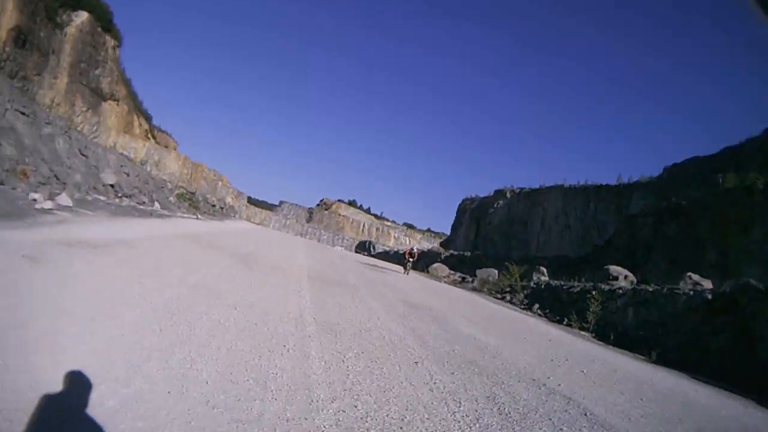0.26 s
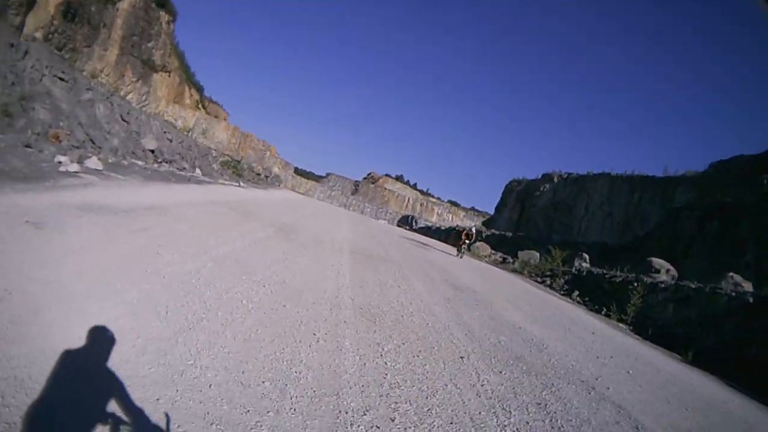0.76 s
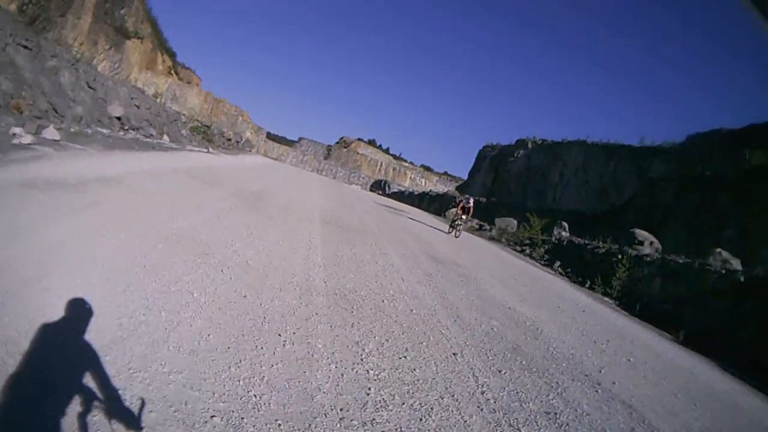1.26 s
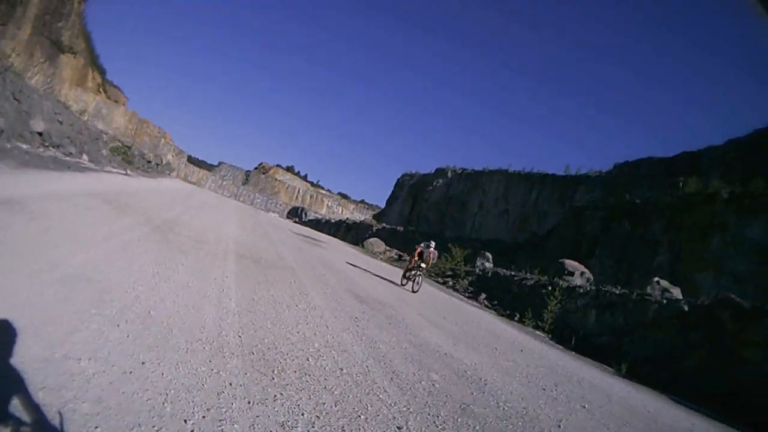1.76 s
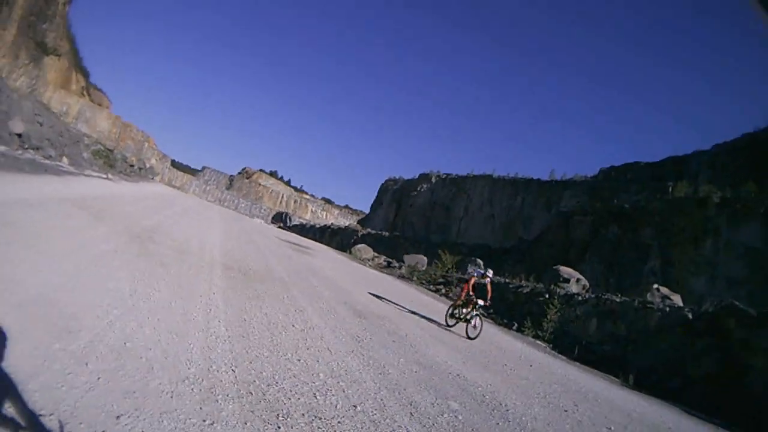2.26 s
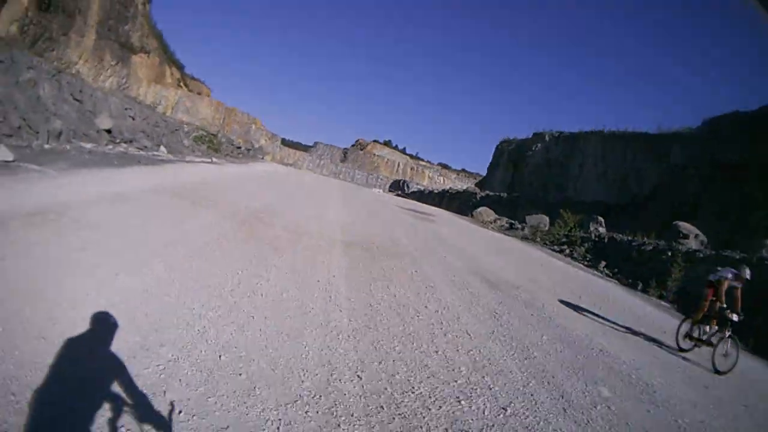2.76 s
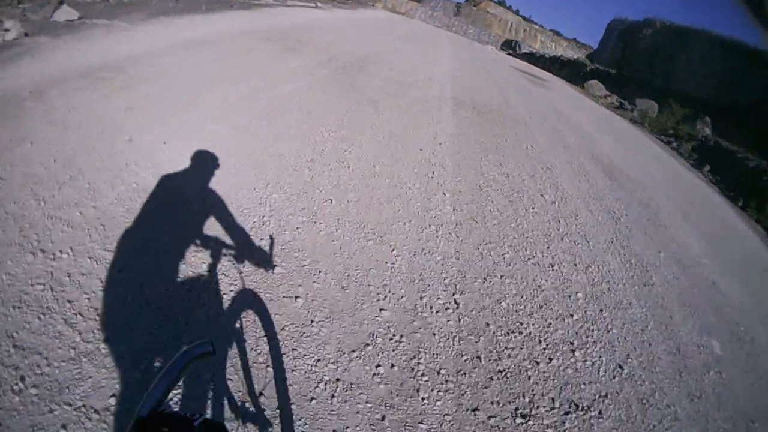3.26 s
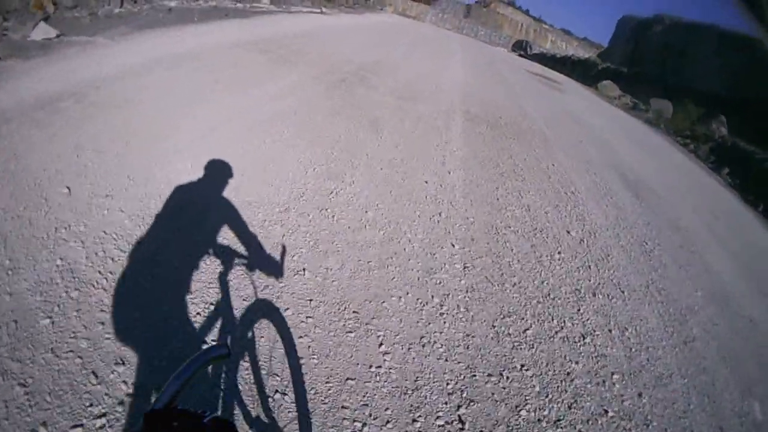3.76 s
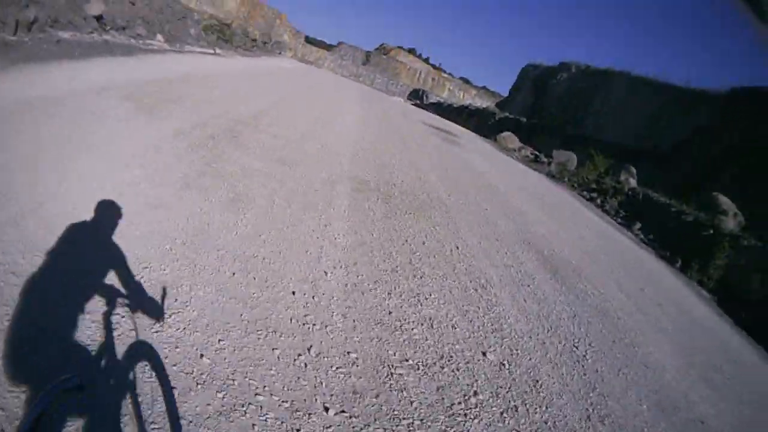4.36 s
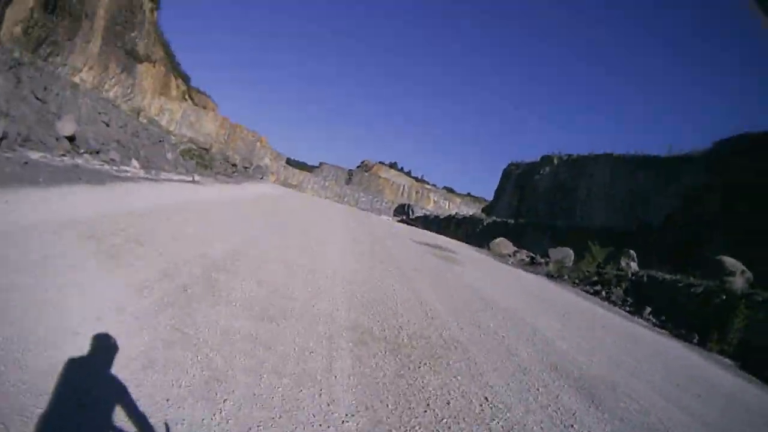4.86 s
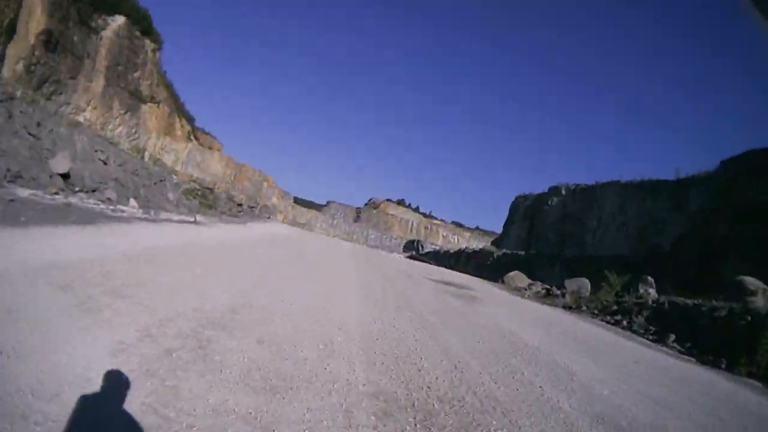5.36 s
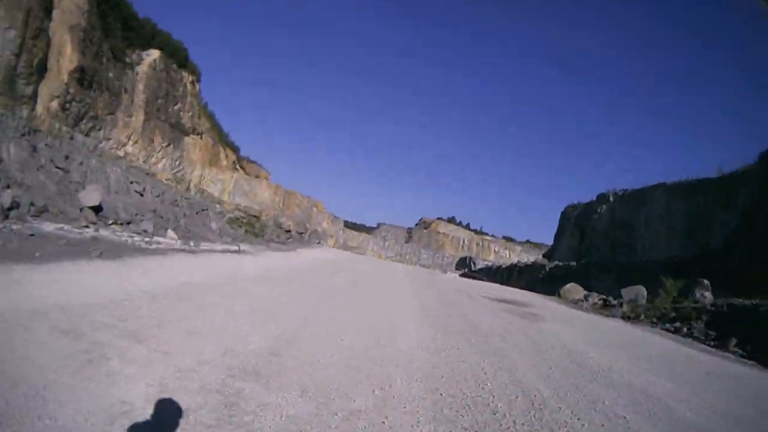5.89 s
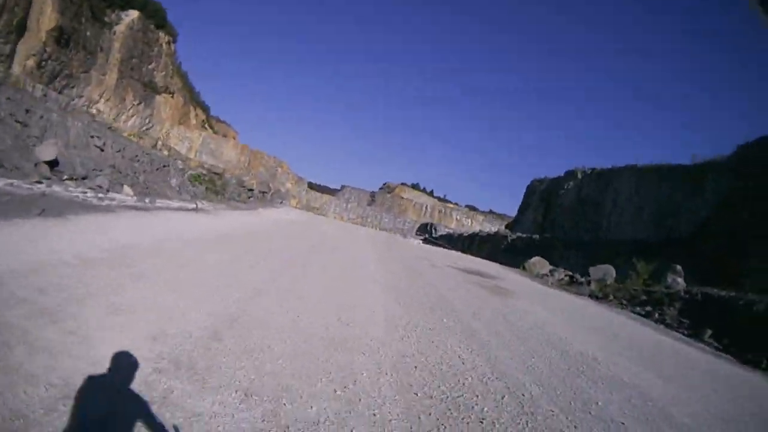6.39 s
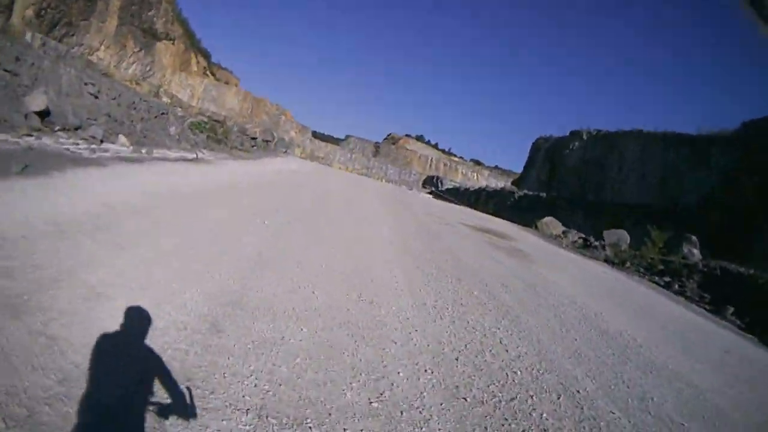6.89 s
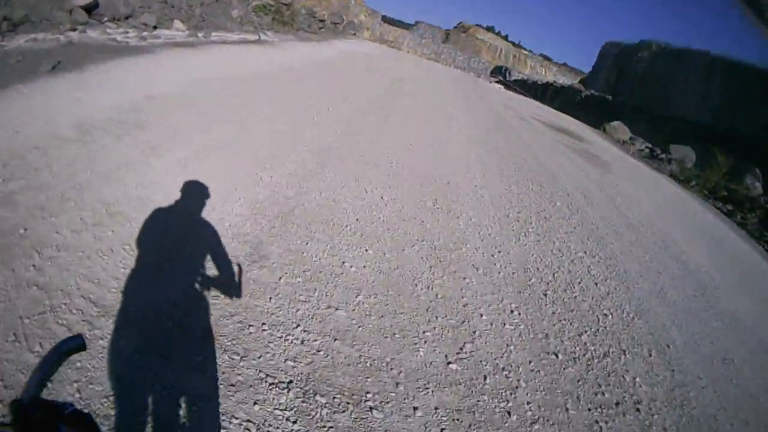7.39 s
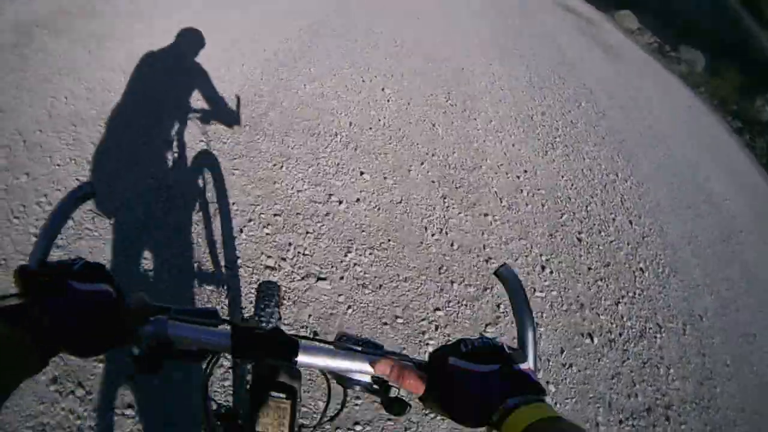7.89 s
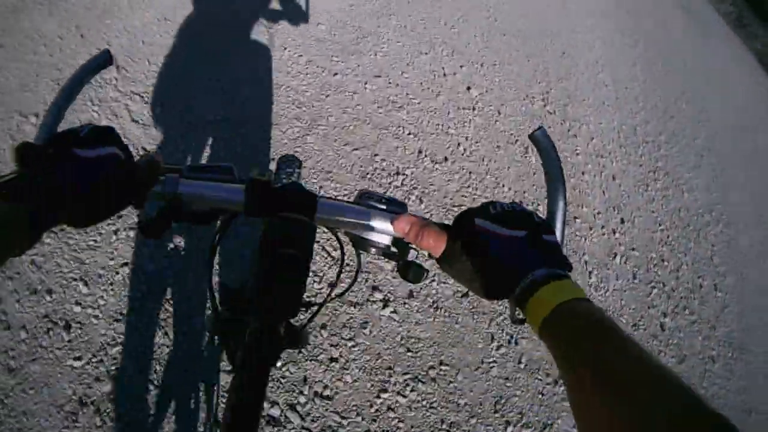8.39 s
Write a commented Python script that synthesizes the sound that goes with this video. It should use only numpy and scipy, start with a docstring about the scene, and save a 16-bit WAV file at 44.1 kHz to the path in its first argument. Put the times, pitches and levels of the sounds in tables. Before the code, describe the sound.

From the rider's own helmet camera, sealed in a small case, a bicycle grinds uphill over gravel. A low, hollow crunch swells and sags about every two thirds of a second with the pedalling. Deep wind buffets thump the microphone throughout. Irregular dull knocks, loose-part clicks and a faint steady rattle ride on top, with a few brief bright pings, mostly after the middle. Outdoors, mono, close, muffled, with slight hiss.

```python
"""Crunching gravel swells with each pedal stroke as a bicycle climbs, amid wind thumps, knocks and pings.
It is heard through the closed case of a small helmet camera, with one microphone.
Shaped noise makes the wind; random grains ring the case, frame and loose parts for tyres and rattle.
Knocks, clicks and pings are dying rings started by short runs of contacts, at listed times.
The recorder hisses more as the signal swings wider."""
import sys
import numpy as np
from scipy import signal
from scipy.fft import rfft, irfft
from scipy.io import wavfile
from scipy.ndimage import uniform_filter1d

SR = 44100
rng = np.random.default_rng(int(sys.argv[2]) if len(sys.argv) > 2 else 0)


def store_pcm(level_fs):
    """Save levels as 16-bit WAV."""
    pcm = np.round(np.clip(level_fs, -1, 1) * 32767).astype(np.int16)
    wavfile.write(sys.argv[1], SR, np.atleast_2d(pcm).T)


N = 381024

# Strength of the wind buffeting. Each row: time in seconds, level in dB before chance gusts and limiting.
WIND = [(0.0, -21.5), (0.14, -31), (0.19, -19.5), (0.43, -22), (0.5, -27.5), (0.77, -22), (0.84, -29.5),
        (1.44, -23.5), (1.61, -29), (1.66, -22.5), (2.07, -30), (2.19, -20), (2.38, -28.5), (2.48, -18.5),
        (2.53, -40), (2.6, -23), (2.81, -15.5), (2.86, -21), (2.93, -18), (3.01, -30.5), (3.2, -21),
        (3.3, -21.5), (3.41, -33), (3.46, -29.5), (3.78, -26.5), (3.97, -15.5), (4.06, -29.5), (4.16, -15),
        (4.28, -33), (4.45, -18.5), (4.48, -29), (4.71, -33.5), (4.79, -12), (4.86, -23.5), (5.27, -23),
        (5.63, -29.5), (5.68, -22), (5.99, -34.5), (6.06, -19.5), (6.13, -32.5), (6.21, -18.5), (6.33, -33),
        (6.42, -21.5), (6.47, -38), (6.52, -21), (6.69, -33), (6.74, -21), (6.81, -32), (7.1, -18.5),
        (7.2, -30.5), (7.24, -22), (7.51, -21.5), (7.53, -14.5), (7.87, -30.5), (7.94, -20), (8.13, -28),
        (8.18, -14), (8.37, -32.5), (8.45, -17.5), (8.64, -26)]
# Tone of the slow wind lumps. Each row: frequency in Hz, relative level in dB.
BUFFET = [(1.8, -43), (3.0, -5.5), (16, 6.5), (28, 1.5), (47, -8.5), (70, -20.5), (150, -120)]
# Tone of the quick wind eddies. Each row: frequency in Hz, relative level in dB.
FLUTTER = [(30, -35), (55, -23.5), (80, -5.5), (130, -13), (250, -20), (400, -44.5), (1500, -80)]
# Upper rumble of the wind. Each row: time in seconds, level in dB.
THROB = [(0.0, -34), (0.21, -39), (0.24, -39), (0.38, -49.5), (1.18, -38.5), (1.28, -32.5), (1.44, -43),
         (1.61, -38), (1.63, -39), (1.76, -39), (1.85, -59), (2.02, -61), (2.09, -32), (2.14, -45),
         (2.5, -37), (3.27, -46), (3.34, -34.5), (3.44, -49), (3.51, -28), (3.75, -44.5), (3.9, -33),
         (3.95, -44), (4.09, -37.5), (4.33, -51), (4.38, -32), (4.64, -52), (4.76, -41), (5.13, -50),
         (5.22, -30), (5.63, -54), (5.7, -38), (5.9, -50), (6.16, -36.5), (6.23, -51), (6.45, -46),
         (6.5, -34.5), (6.69, -53), (6.81, -33), (6.88, -54), (7.03, -34), (7.05, -52), (7.29, -38.5),
         (7.39, -51), (7.51, -42), (7.58, -52), (7.65, -34), (8.13, -37), (8.45, -28.5), (8.49, -39),
         (8.64, -39)]
# Tone of that rumble. Each row: frequency in Hz, relative level in dB.
THROB_BAND = [(22, -29.5), (36, -2.5), (48, -6), (66, -14.5), (95, -27), (150, -47.5), (400, -89.5)]
# Base levels of the ride. Each row: time in seconds, grit in dB, rattle in dB, wind eddies in dB.
# Pedal load is added to all three, and GRIT_DB to the grit.
RIDE = [(0.0, -61.5, -62, -52.5), (0.72, -65.5, -60.5, -49.5), (1.51, -61.5, -58.5, -51.5),
        (1.88, -61, -64, -59), (2.07, -64, -63, -51), (2.19, -68.5, -62, -56), (2.74, -59, -58.5, -45),
        (3.15, -59.5, -62, -57.5), (3.44, -62, -58.5, -51), (3.78, -65.5, -64.5, -52.5),
        (4.11, -59.5, -60.5, -50), (4.57, -59.5, -64.5, -52.5), (5.1, -62, -59.5, -46.5),
        (5.41, -61, -64, -57.5), (5.77, -63.5, -60, -52), (6.06, -61.5, -63.5, -54.5),
        (6.3, -64.5, -60.5, -45), (6.66, -60.5, -63.5, -55.5), (6.98, -62, -61, -47.5),
        (7.07, -60.5, -65.5, -49.5), (7.34, -57.5, -61.5, -52.5), (7.55, -59.5, -57, -46),
        (7.7, -59, -68, -45.5), (8.13, -61.5, -59.5, -50.5), (8.33, -59, -61.5, -52), (8.64, -57, -61, -48)]
# Pedal strokes. Each row: start in seconds, length in seconds, time from start to peak in seconds,
# peak load in dB, coasting level afterwards in dB, upper crunch over lower crunch in dB.
STROKES = [(-0.15, 0.47, 0.15, -47.5, -61, -15), (0.491, 0.54, 0.15, -44.5, -57, 0),
           (1.18, 0.5, 0.34, -46.5, -64, -2), (1.978, 0.37, 0.37, -41, -53.5, -2),
           (2.665, 0.32, 0.16, -45, -55.5, -2), (3.359, 0.73, 0.16, -46.5, -48.5, 6.5),
           (4.172, 0.4, 0.27, -47, -53, -7), (4.891, 0.44, 0.2, -43.5, -59, -11),
           (5.506, 0.4, 0.13, -44.5, -67, -11.5), (6.099, 0.49, 0.24, -43, -58.5, -9.5),
           (6.731, 0.41, 0.26, -45.5, -56, -15.5), (7.41, 0.4, 0.085, -42.5, -53, 2),
           (8.104, 0.41, 0.056, -45, -64.5, 0)]
# Modes (ringing tones) of the hollow case. Each row: pitch in Hz, nominal width in Hz, relative level in dB.
CASE = [(323.2, 93, 2), (401, 67, 2), (442, 150, -13), (538, 71, -18.5), (920, 160, -28.5),
        (1330, 400, -22)]
# Tyre hum. Each row: time in seconds, central pitch in Hz.
HUM = [(0.0, 417), (0.24, 413), (0.74, 427), (0.89, 418), (0.91, 455), (0.98, 418), (1.42, 432),
       (2.26, 420), (2.28, 427), (2.62, 405), (2.72, 429), (3.83, 441), (4.04, 412), (4.09, 420),
       (6.76, 394), (6.95, 430), (7.34, 417), (7.65, 434), (7.99, 412), (8.33, 456), (8.37, 421),
       (8.64, 414)]
# Tone of the dull gravel hiss. Each row: frequency in Hz, relative level in dB.
GRIT = [(150, -6.5), (280, 4.5), (650, -10), (1000, -4.5), (1350, -9.5), (1700, -16), (2200, -13),
        (4000, -20.5), (8000, -20.5)]
# Coarse gravel scrub. Each row: time in seconds, level in dB before SCRUB_TRIM_DB.
COARSE = [(0.0, -56), (0.29, -58), (0.96, -54), (1.47, -60), (1.9, -68), (2.12, -61), (2.26, -65),
          (2.53, -60), (2.79, -61.5), (3.18, -61.5), (3.85, -58), (4.16, -51.5), (5.05, -59), (5.46, -67.5),
          (5.8, -56.5), (5.97, -64), (6.21, -59.5), (7.05, -60), (7.17, -66), (7.65, -61), (7.92, -60),
          (8.64, -63.5)]
# Frame under coarse stones. Each row: pitch in Hz, nominal width in Hz, relative level in dB.
COARSE_RING = [(720, 99, -3), (876, 37, -6), (1110, 410, 2), (1316, 180, -1.5)]
# Loose parts. Each row: pitch in Hz, nominal width in Hz, relative level in dB.
RATTLE = [(1528, 44, -17), (1872, 130, -12.5), (2140, 420, -16), (2480, 110, -15), (2600, 180, -7),
          (3110, 148, -6), (3926, 240, -11.5), (4760, 440, -22), (5180, 280, -6)]
# Highest loose part during the steady rattle. Each row: time in seconds, pitch in Hz.
TOP_RATTLE = [(0.0, 5260), (1.37, 5100), (3.18, 5270), (3.25, 4850), (3.44, 5470), (3.99, 5010),
              (4.14, 5030), (6.38, 5180), (6.52, 5030), (6.62, 5090), (7.31, 5160), (7.43, 5220),
              (8.25, 5090), (8.64, 5240)]
# Stones and jolts reaching the case. Each row: time in seconds, body peak in dB before softening,
# upper modes in dB and low push in dB (both relative to the body), tilt of the upper modes in dB per octave.
KNOCKS = [(0.0914, -28, -14, -16, 13), (0.2393, -20, -27, -8.5, -12), (0.4113, -44, -8, 9, -6),
          (0.441, -47, -20, 6, -6), (0.521, -26, -21, -14, -8), (0.5743, -37, -21, -20, 0),
          (0.8784, -34.5, -16, -1, -3), (1.231, -25.5, -7, -8.5, 4), (1.449, -36, -30, -11, 1),
          (1.67, -36, -6, -5, -6), (1.7498, -26, -17, -9, 0), (1.83, -39.5, -16, 7, -8),
          (1.882, -44, 6, -8, -4), (2.0935, -35, -4, -13, 6), (2.173, -38, 0, -15, 12),
          (2.207, -28, -16, -28, -4), (2.366, -40, -10, -7, -8), (2.467, -39.5, 4, -5, 1.5),
          (2.517, -27, -14, -6, 3), (2.609, -25.5, -10, -7, 7), (2.86, -31.5, -9, -5, -2),
          (3.271, -41, 9, -18, 2), (4.101, -37, -21, -12, -3), (4.393, -28, -9, 4.5, 0),
          (4.596, -22, -12.5, -22, 14), (4.692, -48, -17, 12, 0), (4.81, -43, -15, 15, 0),
          (4.8389, -27, -28, -13, 3), (5.235, -27, -15, 2.5, -5), (5.379, -31, -14, -2, -3),
          (5.4484, -37, 3.5, 9.5, -6), (5.7161, -22, -27, -4.5, 1), (6.104, -40, -20, -6, -6),
          (6.1495, -36.5, -6, -9, 7), (6.462, -39.5, 5.5, -9, 0), (6.4886, -24.5, -19, 0, 5),
          (6.7907, -25.5, -15, -11, 9), (6.848, -41, -24, -20, -6), (7.0695, -24, -22, -19, 4),
          (7.221, -36, -4, -24, -9), (7.5021, -30.5, -29, 2, 2), (7.539, -35, 2.5, -10, -2),
          (7.656, -39, 3.5, 6, -2), (7.787, -26, -14, -26, 10), (7.837, -34, 4, 6, -2),
          (8.1618, -49, -23, 26, 0), (8.45, -30, -5, -5, 9)]
# Rattle clicks. Each row: time in seconds, peak in dB, favoured pitch in Hz, brightness in dB.
CLICKS = [(0.2399, -33, 2100, -18), (0.525, -34.5, 2690, -17), (0.454, -44, 1540, -21),
          (0.614, -40.5, 3100, -8), (0.617, -46, 1530, -27), (0.622, -51, 2600, -12),
          (0.6716, -39, 2600, -5), (0.680, -37, 2820, -4), (0.691, -48, 3100, 2), (0.8772, -38, 3000, -6.5),
          (0.886, -49, 3100, 9), (0.898, -50, 3120, 10), (0.912, -47, 2900, -14), (1.2296, -44, 2300, -17),
          (1.65, -38, 2900, -27), (1.685, -48, 3100, -20), (1.699, -47, 3100, -20), (1.713, -41, 3050, -25),
          (1.749, -41, 1850, -7), (1.941, -46, 2800, -17), (2.049, -51, 2600, -14),
          (2.407, -49.5, 3000, -19), (2.435, -39, 2640, -15), (2.44, -37, 2550, -19),
          (2.459, -50, 2700, -11), (2.517, -42, 2700, -24), (2.733, -41, 3120, -13),
          (2.859, -37.5, 3140, 3), (3.2346, -34.5, 2480, -42), (3.2404, -38, 2480, -36),
          (3.245, -36, 2480, -35), (3.3327, -47, 3110, -26), (3.479, -41, 2470, -41),
          (3.6695, -46, 3150, -25), (4.597, -49, 1500, -36), (5.0, -46.5, 3130, -8),
          (5.016, -53, 3130, -20), (5.059, -40, 3130, -17), (5.19, -42, 3130, -1), (5.203, -48, 3130, -10),
          (5.234, -41.5, 2300, -17), (5.7133, -36.5, 2030, -36), (5.97, -43.5, 2660, -8),
          (6.126, -39, 2800, -10), (6.335, -47, 2470, -37), (6.487, -37, 2200, -24),
          (6.734, -49, 1960, -27), (6.791, -42, 2690, -25), (7.135, -41.5, 3130, -18),
          (7.35, -46, 3130, -13), (7.547, -39, 2450, -10), (7.756, -39, 2500, -22.5),
          (7.7664, -31, 2140, -10), (7.7665, -37, 1530, -23), (7.787, -49, 2630, 7),
          (8.273, -46, 2450, -12), (8.398, -50, 2440, -1), (8.545, -39.5, 3000, 0)]
# Small metal part. Each row: pitch in Hz, relative level in dB, time to die by 60 dB in seconds.
PING = [(2690, -17, 0.028), (3140, -4, 0.013), (4240, -6.5, 0.025), (4930, 0.5, 0.021),
        (5240, 11.5, 0.0057), (6500, 5, 0.0052), (7400, -18, 0.0081)]
# Pings. Each row: time in seconds, peak in dB, tilt in dB per octave, boost of the three lowest modes in dB.
PINGS = [(2.636, -44, -6, -25), (4.197, -36, 24, -11), (5.0833, -41, -16, -8), (6.288, -27, 9, 7),
         (6.512, -28, 23, 5), (7.159, -38.5, -15, 4), (7.177, -40, -12, -1)]

GUSTY_DB, GUST_S = 3, 0.035  # chance lulls and lumps within the wind
CAPSULE_LIMIT = 0.42  # the capsule yields less and less towards this swing
RISE_S, RISE_DB = 0.051, -1.5  # the push starts quickly, to this far under its peak
SAG_DB, FALL_S = -5, 0.12  # the sag from peak to end, then the release
USUAL_LOAD_DB = -48
GRIT_LOAD, RATTLE_LOAD, EDDY_LOAD = 0.18, 0.047, 0.07  # dB for each dB of load above usual
HUM_WIDTH_HZ, HUM_DB, HUM_WANDER = 48.6, 1, 0.017  # hum gain beside the lowest case mode; pitch drift (share)
SURGE_DB, SURGE_S = 1.8, 0.03  # loose and firm patches of gravel
GRIT_DB, CRACKLE_DB, CRACKLE_S = 6.5, 2.5, 0.0034  # hiss raised by this; its fine grain
SCRUB_TRIM_DB = -3
RATTLE_WANDER, RATTLE_FITS_DB, RATTLE_FIT_S = 0.0059, 1, 0.097  # pitch drift (share); each part's own fits
DETUNE, UNEVEN_DB = 0.012, 2.5  # no two hits ring alike: spread of pitch (share) and of mode levels
KNOCK_WIDTH_HZ = 110  # a blow damps the frame: least nominal width of a mode
KNOCK_CHATTER_S = 0.0005
CRACK_DB, CRACK_HZ, CRACK_S = -9, 1880, 0.0069  # splintering noise: level before tilt, top of band, decay
CLICK_WIDTH_HZ = 100  # a struck part touches its neighbours: least nominal width of a mode
CLICK_CHATTER_S = 0.0015
CLICK_NARROW_DB = 19  # fall per octave from the favoured pitch, before the effect of brightness
PURE_PER_DB = 0.5  # extra fall in dB per octave for each dB of dullness
SNAP_DB, SNAP_BRIGHT, SNAP_S = -10, 0.52, 0.0025  # dry click noise; its dB per dB of brightness; decay
PING_CHATTER_S = 0.0039
SPRAY_DB, SPRAY_S = -15.5, 0.0017  # bright noise at the start of a ping
OFFSET = 0.024  # steady offset of the recorder
HISS_DB, HISS_KNEE = -34, 0.016  # hiss relative to the swing; swing below which it levels out
EDGE_HZ = 8700  # final band limit


def gain_of(db):
    """Turns decibels into a multiplying factor."""
    return 10 ** (np.asarray(db) / 20)


def evened(x):
    """Scales a sound to an average (rms) strength of 1."""
    return x / np.sqrt(np.mean(x ** 2) + 1e-20)


def steadied(x, samples, floor):
    """Reduces chance swells by dividing by the strength around each moment, plus a floor."""
    return evened(x / np.sqrt(uniform_filter1d(x ** 2, samples) + floor))


def curve(rows, axis=1):
    """Joins one column of a timed table into a value for every sample."""
    rows = np.array(rows)
    return np.interp(np.arange(N) / SR, rows[:, 0], rows[:, axis])


def clumps(seconds):
    """Makes a slow random wander of strength 1 by smoothing noise twice."""
    step = 32  # samples between computed points
    size = max(round(seconds * SR / step), 1)
    slow = rng.standard_normal(N // step + 1)
    slow = uniform_filter1d(uniform_filter1d(slow, size), size)
    return np.interp(np.arange(N) / step, np.arange(len(slow)), evened(slow))


def coloured(x, points):
    """Filters x by a tone curve, joined on a logarithmic pitch scale."""
    f, db = np.transpose(points)
    hz = np.fft.rfftfreq(N, 1 / SR)
    tone_db = np.interp(np.log(hz + 1), np.log(f + 1), db)
    return evened(irfft(rfft(x) * gain_of(tone_db), N))


def grains(per_s, spread_db):
    """Scatters random clicks of either sign; a few are large."""
    size = gain_of(spread_db * np.minimum(rng.exponential(1, N), 5))
    size = size * rng.choice([-1, 1], N)
    return size * (rng.random(N) < per_s / SR)


def ring(modes, damping=0.91, size=2048):
    """Adds dying sine waves, one per mode; wider modes die sooner, and the peak is 1."""
    t = np.arange(size) / SR
    h = np.zeros(size)
    for hz, width, db in modes:
        h += gain_of(db) * np.exp(-np.pi * width * damping * t) * np.sin(2 * np.pi * hz * t)
    return h / abs(h).max()


def resonate(x, hz, width):
    """Passes x through a resonance that follows the pitch curve hz."""
    turn = np.exp(2j * np.pi * np.cumsum(hz) / SR)
    r = np.exp(-np.pi * width / SR)
    return (turn * signal.lfilter([1], [1, -r], x / turn)).real


def varied(modes):
    """Shifts the modes slightly in pitch and level, by chance."""
    z = rng.standard_normal((len(modes), 2))
    return [(f * (1 + DETUNE * a), w, d + UNEVEN_DB * b) for (f, w, d), (a, b) in zip(modes, z)]


def burst(low_hz, high_hz, seconds):
    """Makes a dying puff of band noise, peak 1."""
    band = signal.butter(2, [low_hz, min(high_hz, .45 * SR)], "bandpass", fs=SR, output="sos")
    puff = rng.standard_normal(2048) * np.exp(-np.arange(2048) / (SR * seconds))
    x = signal.sosfilt(band, puff)
    return x / abs(x).max()


def chatter(bounce_s):
    """Makes a first contact and a short, dying run of mostly smaller random ones."""
    bounces = rng.standard_normal(700) * (rng.random(700) < .06)
    bounces *= 0.39 * np.exp(-np.arange(700) / (SR * bounce_s + 1))
    bounces[0] = 1
    return bounces


def bounced(body, bounce_s):
    """Strikes a ring with a chatter of contacts, peak 1."""
    sound = signal.oaconvolve(body, chatter(bounce_s))
    return sound / abs(sound).max()


def add(mix, s, sound):
    """Mixes a sound in at time s."""
    part = mix[round(s * SR):][:len(sound)]
    part += sound[:len(part)]


def pedalling():
    """Gives load, load above usual and fineness in dB: each stroke rises, peaks, sags and lets go."""
    rows, before = [], STROKES[0][4]
    for s, length, peak_s, db, coast_db, _ in STROKES:
        rows += [(s, before), (s + RISE_S, db + RISE_DB), (s + peak_s, db),
                 (s + length, db + SAG_DB), (s + length + FALL_S, coast_db)]
        before = coast_db
    load = curve(sorted(rows))
    fine_db = curve([(s + length / 2, upper_db) for s, length, _, _, _, upper_db in STROKES])
    return load, load - USUAL_LOAD_DB, fine_db


def wind():
    """Slow pressure lumps push a microphone that yields less when pushed far; quick eddies thump."""
    # The lumps are evened out; the wind table, with small random lulls and lumps, sets their level.
    lumps = steadied(coloured(rng.standard_normal(N), BUFFET), 3500, 0.028)
    level = gain_of(curve(WIND) + GUSTY_DB * clumps(GUST_S))
    pushed = CAPSULE_LIMIT * np.tanh(level * lumps / CAPSULE_LIMIT)
    low_pass = signal.butter(3, 38, fs=SR, output="sos")
    eddies = coloured(grains(120, 5.0), FLUTTER)
    eddy_db = curve(RIDE, axis=3) + EDDY_LOAD * pedalling()[1]
    return signal.sosfiltfilt(low_pass, pushed) + gain_of(eddy_db) * eddies


def throb():
    """The upper rumble of the wind is made of lumpy low thumps, held to its level."""
    rumble = coloured(grains(45, 3.5), THROB_BAND)
    return gain_of(curve(THROB)) * steadied(rumble, 5000, 0.15)


def pings():
    """A small metal part rings brightly, each mode dying at its own pace, with a puff of noise."""
    mix = np.zeros(N)
    t = np.arange(2048) / SR
    for s, db, tilt_db, low_db in PINGS:
        ping = np.zeros(2048)
        for hz, mode_db, t60 in PING:
            mode_db += low_db * (hz < PING[3][0]) + tilt_db * np.log2(hz / 5000)
            ping += gain_of(mode_db - 60 * t / t60) * np.sin(2 * np.pi * hz * t)
        ping = ping / abs(ping).max() + gain_of(SPRAY_DB) * burst(3500, 8000, SPRAY_S)
        ping *= 1 - np.exp(-t / 0.000065)  # very short start
        add(mix, s, gain_of(db) * bounced(ping, PING_CHATTER_S))
    return mix


def clicks():
    """A bouncing contact shakes loose parts, favouring those tuned near the given pitch."""
    mix = np.zeros(N)
    for s, db, hz, bright_db in CLICKS:
        fall_db = CLICK_NARROW_DB - PURE_PER_DB * bright_db
        near = [(f, max(w, CLICK_WIDTH_HZ), d / 2 - fall_db * abs(np.log2(f / hz)))
                for f, w, d in RATTLE[:6]]
        bright = ring(varied(RATTLE[6:]), 0.78)
        parts = ring(varied(near), 0.87) + gain_of(bright_db) * bright
        parts[:90] *= np.linspace(0, 1, 90)  # the parts take a moment to start
        parts += gain_of(SNAP_DB + SNAP_BRIGHT * bright_db) * burst(1000, 3100, SNAP_S)
        add(mix, s, gain_of(db) * bounced(parts, CLICK_CHATTER_S))
    return mix


def knocks():
    """Stones and jolts ring the case and frame, splinter, and push the capsule slowly."""
    mix = np.zeros(N)
    u = np.arange(2048) / (SR * 0.0012)
    push = u * (1 - .5 * u) * np.exp(1 - u)
    blow = signal.windows.hann(11) / 5  # rubber and stone meet softly
    soft = signal.windows.hann(35) / 17  # the case takes the jolt more slowly still
    for s, db, upper_db, push_db, tilt_db in KNOCKS:
        frame = [(f, max(w, KNOCK_WIDTH_HZ), tilt_db * np.log2(f / 1000)) for f, w, _ in COARSE_RING]
        crack = gain_of(CRACK_DB + tilt_db / 2) * burst(550, CRACK_HZ, CRACK_S)
        upper = ring(varied(frame), 0.65) + crack
        # Doubling the dB widens the level differences between case modes.
        body = ring([(f, w, 2 * d) for f, w, d in CASE[:4]], 0.65)
        add(mix, s, gain_of(db) * np.convolve(bounced(body, KNOCK_CHATTER_S), soft))
        add(mix, s, gain_of(db + upper_db) * np.convolve(bounced(upper, KNOCK_CHATTER_S), blow))
        add(mix, s, gain_of(db + push_db) * np.convolve(push, soft))
    return mix


def rattle():
    """Loose parts chatter in fits; each small hit rings one of their drifting modes."""
    which = rng.integers(0, len(RATTLE), N)
    hits = grains(2500, 2.0) * gain_of(3.0 * clumps(0.0053))
    pitches = [hz * (1 + RATTLE_WANDER * clumps(0.19)) for hz, _, _ in RATTLE[:-1]]
    pitches.append(curve(TOP_RATTLE))
    out = np.zeros(N)
    for k, (_, width, db) in enumerate(RATTLE):
        fits = gain_of(db + RATTLE_FITS_DB * clumps(RATTLE_FIT_S))
        out += fits * resonate(hits * (which == k), pitches[k], width)
    return gain_of(curve(RIDE, axis=2) + RATTLE_LOAD * pedalling()[1]) * evened(out)


def scrub():
    """Coarse stones grind under the tyre in fits and ring the frame."""
    hits = grains(1500, 2.6) * gain_of(12.0 * np.tanh(1.8 * clumps(0.022)))
    ringing = evened(signal.oaconvolve(hits, ring(COARSE_RING))[:N])
    return gain_of(curve(COARSE) + SCRUB_TRIM_DB) * ringing


def grit():
    """Fine gravel makes a dull hiss of tiny grains that comes in clumps."""
    lumps_db = 6.2 * np.tanh(0.76 * clumps(0.025)) + CRACKLE_DB * clumps(CRACKLE_S)
    hiss = coloured(grains(3000, 1.9) * gain_of(lumps_db), GRIT)
    return gain_of(GRIT_DB + curve(RIDE) + GRIT_LOAD * pedalling()[1]) * hiss


def tyre_crunch():
    """Crushed stones ring the case, with a drifting hum, and swell with each pedal stroke."""
    band = ring([(432, 213, 0)])  # tyre and frame pass only a low band
    stones = grains(2500, 2.87)
    hum_hz = curve(HUM) * (1 + HUM_WANDER * clumps(0.046))
    hum = gain_of(HUM_DB) * resonate(stones, hum_hz, HUM_WIDTH_HZ)
    lowest_mode = resonate(stones, np.full(N, CASE[0][0]), CASE[0][1])
    low = evened(signal.oaconvolve(hum + lowest_mode, band)[:N])
    upper_ring = signal.oaconvolve(ring(CASE[2:]), band)
    high = evened(signal.oaconvolve(grains(2500, 3.2), upper_ring)[:N])
    load_db, _, fine_db = pedalling()
    fine = gain_of(fine_db)
    low = gain_of(SURGE_DB * clumps(SURGE_S)) * low
    high = gain_of(SURGE_DB * clumps(SURGE_S)) * high
    crunch = (low + fine * high) / np.sqrt(1 + fine ** 2)
    # Chance swells are partly evened out, then the pedal load shapes the level.
    return gain_of(load_db) * steadied(crunch, 2200, 0.32)


def scene():
    """Adds everything that reaches the single microphone."""
    background = wind() + throb()
    hits = pings() + clicks() + knocks()
    return (background + hits + rattle() + scrub() + grit() + tyre_crunch())[None]


def record(dry):
    """Adds a steady offset and hiss that grows with the swing, then rolls off the treble."""
    x = dry + OFFSET
    swing = np.sqrt(x ** 2 + HISS_KNEE ** 2)
    x = x + gain_of(HISS_DB) * swing * rng.standard_normal(x.shape)
    x = signal.sosfiltfilt(signal.butter(9, 7850, fs=SR, output="sos"), x)
    band_limit = signal.firwin(511, EDGE_HZ, window=("kaiser", 9), fs=SR)
    return signal.oaconvolve(x, band_limit[None], "same")


dry = scene()
out = record(dry)
store_pcm(out)
```